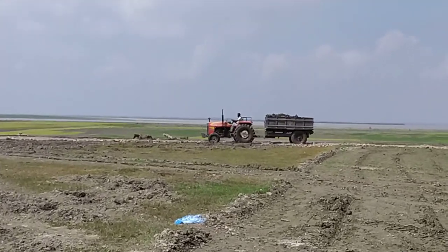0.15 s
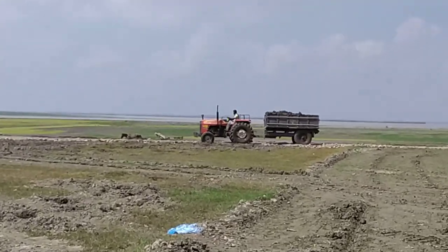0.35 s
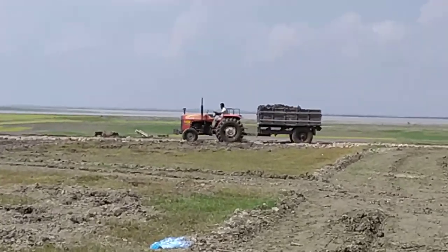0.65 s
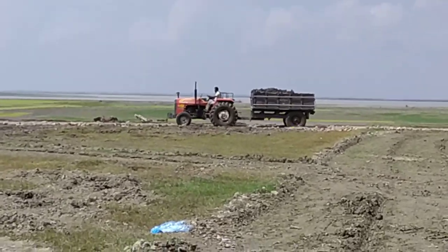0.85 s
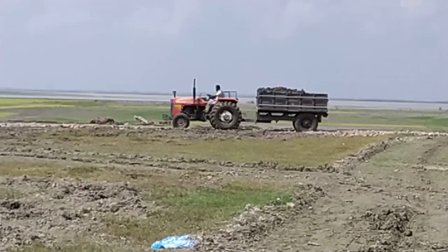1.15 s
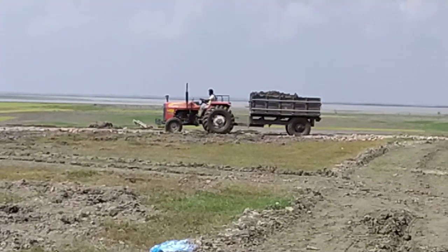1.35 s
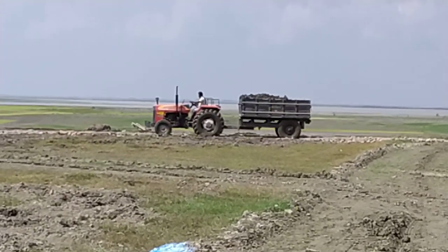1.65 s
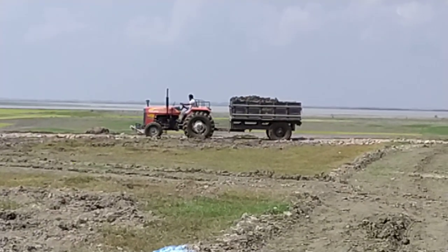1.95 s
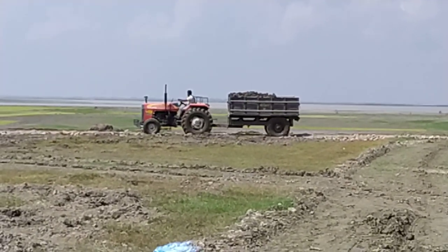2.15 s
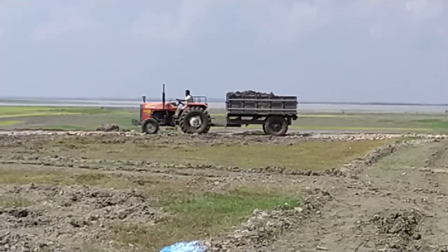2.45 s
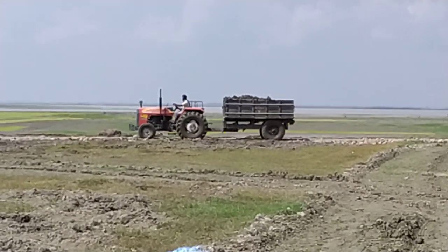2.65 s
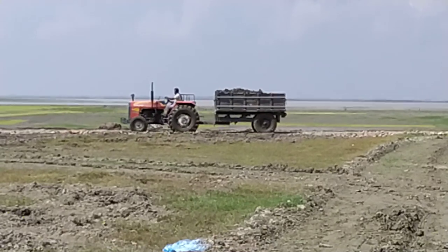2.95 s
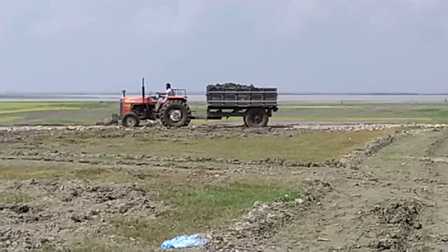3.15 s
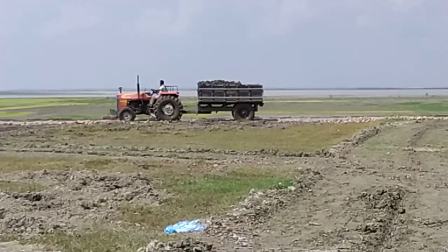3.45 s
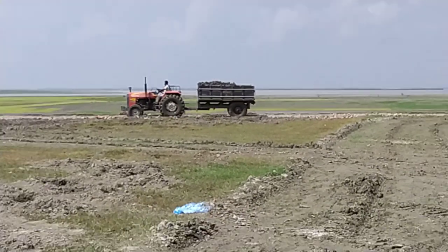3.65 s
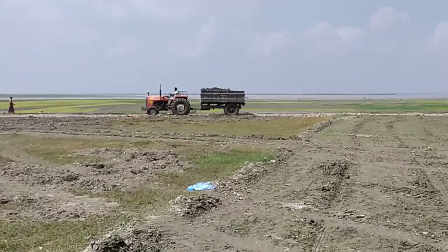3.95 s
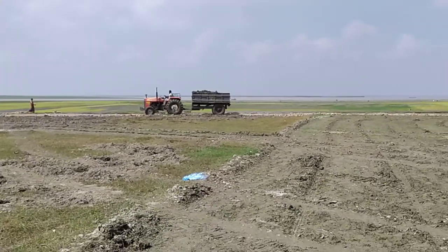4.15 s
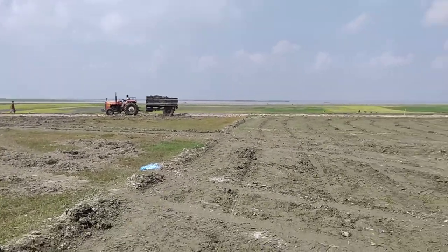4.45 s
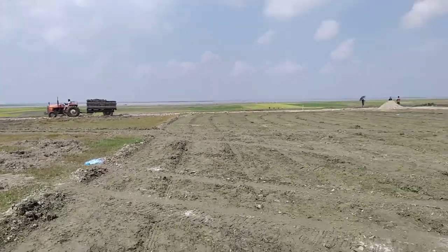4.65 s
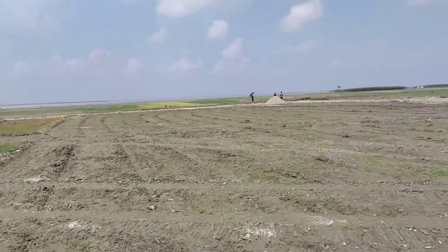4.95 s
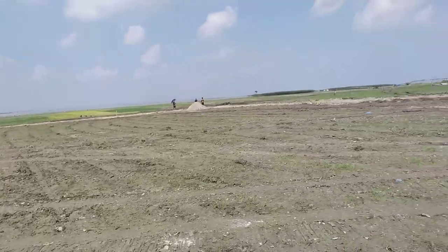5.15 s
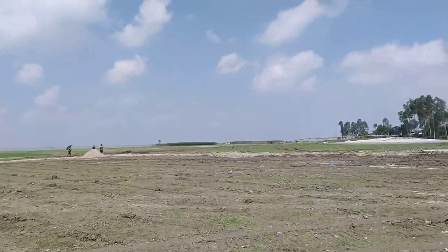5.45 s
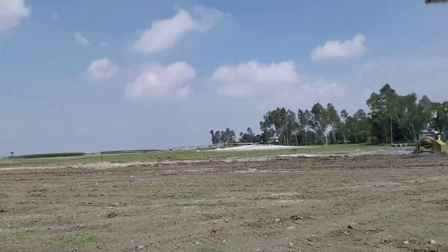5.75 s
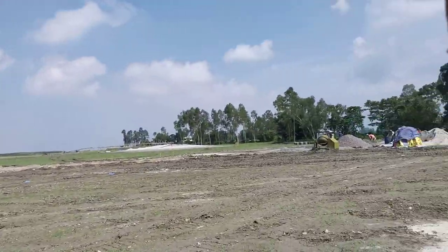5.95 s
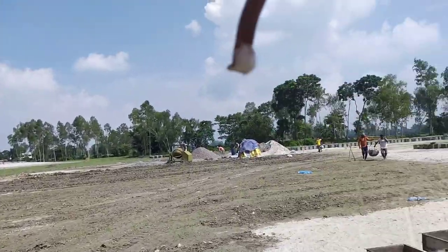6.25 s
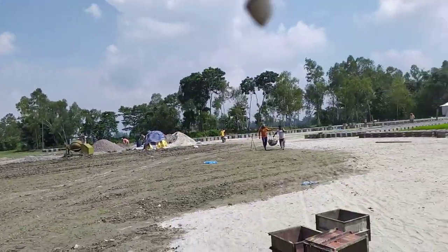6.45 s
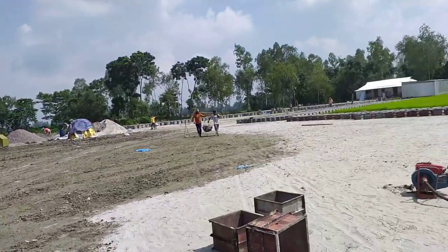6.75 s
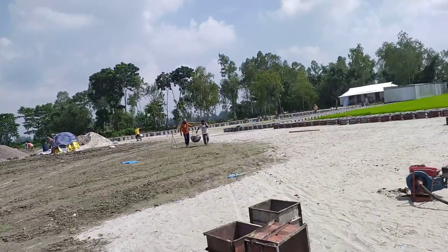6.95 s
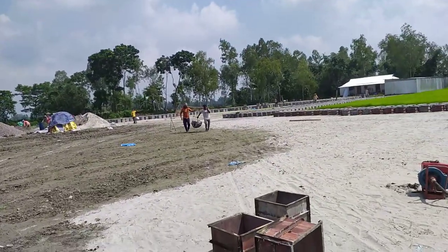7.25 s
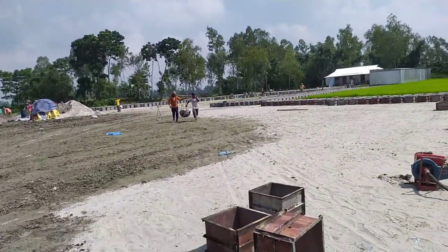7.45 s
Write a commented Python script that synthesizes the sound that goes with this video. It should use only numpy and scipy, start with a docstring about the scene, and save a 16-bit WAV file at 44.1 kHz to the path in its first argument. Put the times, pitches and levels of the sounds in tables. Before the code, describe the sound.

Steady shrill squealing of a spinning shaft around a low hum, fast engine puttering and rattling covers, soft wind, two brief hard knocks.

```python
"""Concrete poker vibrator driven by a small engine

A small four-stroke engine drives the poker through a flexible shaft in an open yard. The poker hums as harmonics
of its speed, and the rubbing shaft squeals loudly as short squeaks in every turn. Under them the exhaust putters
as engine harmonics, and filtered noise and rings make the clatter. Wind rumbles softly and two light clacks fall
midway. The camera, with a microphone port on each side, swings towards the machine and recolours the sounds."""
import sys
import numpy as np
from scipy import signal
from scipy.fft import rfft, irfft
from scipy.io import wavfile
from scipy.ndimage import uniform_filter1d, minimum_filter1d, map_coordinates

SR = 44100
rng = np.random.default_rng(int(sys.argv[2]) if len(sys.argv) > 2 else 0)


def generate_wav(signal):
    """Clip the signal to [-1, 1] and save it as 16-bit WAV at the path in sys.argv[1]."""
    frames = np.transpose(np.atleast_2d(signal))
    scaled = np.clip(frames, -1, 1) * 32767
    pcm = np.round(scaled).astype(np.int16)
    wavfile.write(sys.argv[1], SR, pcm)


N = 335160
TIME = np.arange(N) / SR
HZ = np.fft.rfftfreq(N, 1 / SR)

# mean speed of the poker, hunting under the load: t/s, speed/(turns per second)
SPEED = [(0, 182.8), (.12, 183.5), (.35, 182.7), (.55, 180.4), (1.1, 180.6), (1.33, 182.5), (1.72, 182.7),
         (2.05, 182.2), (2.25, 180.7), (2.72, 183), (2.95, 180.6), (3.1, 180.5), (3.7, 182.8), (3.9, 182.4),
         (4.2, 179.5), (4.5, 179.3), (4.8, 180.2), (5, 182.9), (5.4, 182.6), (5.58, 180.8), (5.78, 182.4),
         (6.15, 181.3), (6.48, 180.2), (6.7, 180.9), (7, 182.7), (7.25, 182.7), (7.38, 180.4),
         (7.55, 182.9)]
TURNS_PER_CYCLE = 8.4138  # poker turns in one engine cycle, which is two turns of the crank


def amp(db):
    """Decibels to gain."""
    return 10 ** (np.asarray(db) / 20)


def unit(x):
    """Scales to an rms of one."""
    return x / np.sqrt(np.mean(x ** 2) + 1e-20)


def curve(rows, column=1):
    """One column of a table, joined by straight lines in time."""
    rows = np.asarray(rows, float)
    return np.interp(TIME, rows[:, 0], rows[:, column])


def facing():
    """How far the camera faces the machine, from 0 (away) to 1 (towards it)."""
    # the camera's swing: t/s, share facing the machine/(0-1)
    camera_swing = [(0, 0.14), (4.3, 0.05), (5.2, 0.2), (5.75, 0.69), (6.5, 0.84), (7.1, 0.89), (7.6, 0.99)]
    return np.clip(curve(camera_swing), 0, 1)


def drift(rate_hz):
    """Smooth random wander of rms one, fading out above the rate."""
    return unit(irfft(rfft(rng.standard_normal(N)) * np.exp(-(HZ / rate_hz) ** 2), N))


def delayed(x, seconds):
    """The sound heard after a delay that may change with time."""
    return map_coordinates(x, [(TIME - seconds) * SR], order=1, mode="mirror")


def ports(x, lead_s=0.0001946):
    """Sound from the left reaches the left microphone port first."""
    return np.array([x, delayed(x, lead_s)])


def colour(x, spectrum):
    """Filters by a table of f/Hz and level/dB, to an rms of one."""
    hz, db = np.transpose(spectrum)
    gain = amp(np.interp(np.log(HZ + 1), np.log(hz), db))
    return unit(irfft(rfft(x) * gain, N))


def swing(x, away, toward):
    """Blends two colours, at equal power, as the camera swings round."""
    return np.sqrt(1 - facing()) * colour(x, away) + np.sqrt(facing()) * colour(x, toward)


def whiten(x, size=11, count=70):
    """Evens out each port's broad spectrum, over size bins and count frames, and keeps its fine lines."""
    z = signal.stft(x, nperseg=2048, noverlap=1536)[2]
    power = uniform_filter1d(abs(z) ** 2, size=size, axis=1)
    power = uniform_filter1d(power, size=count, axis=2)
    flat = z / np.sqrt(abs(power) + 1e-7 * power.max())
    return signal.istft(flat, nperseg=2048, noverlap=1536)[1][:, :N]


def scattered(x, echo_db, spread_s, slide_s=0.00209, count=7):
    """Short echoes off the moulds and the machine; their paths slide as the camera moves."""
    out = ports(x)
    moved = facing() ** 0.756 + 0.018 * drift(0.83)
    for channel in out:
        for place, slide, sign in rng.random((count, 3)):
            lag = 0.000512 + spread_s * place ** 2 + slide_s * (slide - .3) * moved
            channel += amp(echo_db) * np.sign(sign - .5) * delayed(x, lag) / np.sqrt(count)
    return out


def diffused(x, wash_db):
    """Adds steady noise, separate at each port, for the many faint echoes that blur into a wash."""
    return unit(x) + amp(wash_db) * rng.standard_normal((2, N))


def levelled(x, size=4000):
    """Holds each channel at a running rms of one, over a window of size samples."""
    return x / np.sqrt(uniform_filter1d(x ** 2, size=size, axis=1))


def resonate(x, hz, width_hz):
    """A resonance of gain one that follows a moving pitch: shift to zero, smooth, shift back."""
    turn = np.exp(2j * np.pi * np.cumsum(hz) / SR)
    r = np.exp(-np.pi * width_hz / SR)
    return 2 * (turn * signal.lfilter([1 - r], [1, -r], x / turn)).real


def ring_filter(x, hz, width_hz):
    """Two resonant poles in a row, as of a struck part that rings at one pitch."""
    return irfft(rfft(x) / (1 + 1j * (HZ - hz) / width_hz) ** 2, N)


def gliding(x):
    """Narrow bands swell, slide and sink back as echo paths change with the camera's moves."""
    # sliding bands: start t/s, end t/s, from f/Hz, to f/Hz, width/Hz, peak added gain left, the same right
    glides = [(.85, 1.75, 5880, 6100, 160, .7, .3), (1.3, 3.2, 5480, 5500, 130, .7, .1),
              (2.6, 4.7, 5640, 5540, 130, 1, 0), (6.5, 7.7, 6000, 6060, 130, 0, .9),
              (4.25, 4.8, 5600, 5150, 120, 1, .3), (4.45, 5.02, 5650, 6150, 130, 1.2, .6),
              (4.85, 5.25, 5520, 5150, 120, 1.6, .6), (4.87, 5.55, 6350, 5720, 130, .3, 1.4),
              (5, 5.65, 5480, 5080, 130, 1, 2), (5.1, 5.65, 6450, 5520, 130, 1.1, .5),
              (5.33, 5.68, 6500, 6050, 130, 2, .5), (5.55, 6.02, 6260, 6180, 130, .8, 1.6),
              (5.9, 6.4, 6250, 5680, 150, .4, 1.6), (5.85, 6.65, 6420, 5660, 130, 2, .3),
              (4.1, 4.9, 1520, 1280, 120, .7, .7), (5.4, 6.7, 1300, 1030, 130, .8, .8),
              (5.95, 6.7, 2350, 1980, 260, 1.2, 1.2)]
    out = x.copy()
    for start, end, from_hz, to_hz, width_hz, left, right in glides:
        span = (TIME >= start) & (TIME < end)
        way = (TIME[span] - start) / (end - start)
        hz = from_hz + (to_hz - from_hz) * way
        swell = np.outer([left, right], np.sin(np.pi * way))
        out[:, span] += swell * resonate(x[:, span], hz, width_hz)
    return out


def shaft_wobble(sway_hz=9.5, sway_turns=.011, whip_hz=10.2, jitter_hz=9, jitter_turns=.009):
    """Turns by which the flexible shaft leads or lags: a slight sway, irregular jitter and short fits of whipping."""
    # fits of whipping that make the squeal warble: middle t/s, half length/s, depth/turns
    whips = [(1.32, .22, .036), (2.28, .1, .028), (2.76, .15, .034), (3.55, .08, .03), (4.62, .15, .022),
             (5.3, .25, .032), (6.12, .2, .03), (7.13, .15, .014)]
    sway_phase = 2 * np.pi * (sway_hz * TIME + .2 * drift(1.5))
    wobble = sway_turns * (1 + .35 * drift(1.5)) * np.sin(sway_phase)
    wobble += jitter_turns * drift(jitter_hz)
    for middle, half, depth in whips:
        fit = np.exp(-((TIME - middle) / half) ** 2)
        wobble += depth * fit * np.sin(2 * np.pi * whip_hz * (TIME - middle))
    return wobble


def poker_hum(turns, steepness=5, waver_db=1.25):
    """The off-centre weight shakes the tube once a turn, giving a hum and wavering harmonics."""
    # hum harmonics: multiple of the poker's speed, mean level facing away/dB, the same facing the machine/dB
    harmonics = [(1, -22.5, -24), (2, -41.5, -25.5), (3, -44.5, -37), (4, -48.5, -35.5), (5, -67, -38),
                 (6, -66, -50)]
    out = np.zeros(N)
    for k, away_db, facing_db in harmonics:
        level_db = away_db + (facing_db - away_db) * facing() ** steepness
        level_db += waver_db * np.sqrt(k) * drift(3.6)
        out += np.sqrt(2) * amp(level_db) * np.cos(2 * np.pi * (round(k) * turns + rng.random()))
    return ports(out, lead_s=0.000097)


def squeal_level_db(edge_s=.1):
    """Level of the squeal at each port: steady, but for spells that ease in and out."""
    # steady squeal: left level/dB, right level/dB
    steady_db = (-10.5, -9)
    # swells and fades: start t/s, end t/s, change at the left port/dB, change at the right port/dB
    spell_rows = [(0, .9, -9.5, .7), (.32, .56, 3, .7), (.9, 1.44, 5, 1.5), (1.44, 1.85, 1.5, .3),
                  (2.18, 2.38, -1.5, -2.7), (2.45, 2.88, .6, .8), (2.92, 3.38, -4, -.7),
                  (3.1, 3.3, -3.5, -.5), (3.5, 3.98, .5, 1), (4.33, 4.57, 0, -3), (4.59, 4.72, 1.5, 2.5),
                  (4.76, 4.89, -.5, -3), (4.92, 5.07, 2, 1.5), (5.12, 5.38, -.5, 1.3), (5.38, 5.56, 3, .5),
                  (5.56, 5.96, -7, 0), (5.66, 6.28, 0, 3.3), (5.96, 6.46, -4.5, 0), (6.42, 6.52, 0, -3),
                  (6.46, 6.88, -6, -1), (6.88, 7.7, -10, -2.5), (7.45, 7.7, 1.5, 1.5)]
    db = np.outer(steady_db, np.ones(N))
    for start, end, left_db, right_db in spell_rows:
        db += np.outer([left_db, right_db], (TIME >= start) & (TIME < end))
    return uniform_filter1d(db, size=round(edge_s * SR), axis=1)


def squeal(turns, crank, pitch_hz=5720, rise_hz=170, sag_hz=140, throb_db=2.5, octave_db=-14,
           octave_throb_db=2.5, scatter_db=1.1, hiss_db=-27, wash_db=-16, flutter_db=.85, flutter_hz=14):
    """Each rub squeaks the tube nearly alike in every turn, so the squeal is a comb of lines that waver with speed."""
    # rubs in each turn: place/(turn 0-1), length/turns, level/dB, loudest place/(crank turn 0-1)
    rubs = [(.1, .12, 0, .8), (.37, .11, -1, .78), (.78, .12, -.5, .55)]
    # ring of the steel tube and its hose, facing away and facing the machine: f/Hz, relative level/dB
    ring_away = [(3800, -24), (4330, -12.5), (4600, -18), (5020, -1.5), (5200, 0), (5470, 3.5), (5640, 4.5),
                 (5800, -2), (6000, -4.5), (6230, -4.5), (6450, -9.5), (6650, -4.5), (6790, -3.5),
                 (7050, -22.5), (7550, -11), (7800, -24.5), (8280, -8), (9000, -30), (9900, -23),
                 (10600, -13), (11200, -13.5), (11620, -3), (12050, -39), (12700, -35), (16000, -40)]
    ring_facing = [(3800, -21), (4700, -17.5), (5200, -36), (5450, -11.5), (5800, 1), (6020, 4.5),
                   (6220, 4), (6500, -20), (6700, -11), (6820, -13), (7200, -19), (7950, -26), (8300, -18),
                   (9000, -32), (10800, -17.5), (11250, -20.5), (11600, -9), (12000, -12), (12700, -43),
                   (16000, -31)]

    # the crank's uneven pull bends timing and pitch; the pitch drops fast and climbs slowly
    lurch = 1 - .3 * facing()  # radians
    pull = 2 * np.pi * (crank - .48)
    sag = sag_hz * (np.sin(pull) + 0.19 * np.sin(2 * pull))
    pitch = pitch_hz + rise_hz * facing() - sag
    octave = amp(octave_db + octave_throb_db * np.cos(pull))
    speed = curve(SPEED)
    squeaks, contact = np.zeros(N), np.zeros(N)
    for place, length, db, loudest in rubs:
        offset = (turns - place + .5) % 1 - .5  # turns from the middle of the rub
        throb = 2 * np.pi * (crank - loudest)
        force = amp(db + scatter_db * drift(48) + throb_db * np.cos(throb))
        force *= np.exp(-.5 * (offset / length) ** 2)
        phase = 2 * np.pi * pitch * offset / speed + lurch * np.sin(throb)
        phase += .08 * drift(100) + .33 * drift(4) + 2 * np.pi * rng.random()  # no two squeaks quite alike
        squeaks += force * (np.cos(phase) + octave * np.cos(2 * phase))
        contact += force
    hiss_throb = amp(octave_throb_db * np.cos(pull) / 2)
    squeaks += amp(hiss_db) * contact * hiss_throb * rng.standard_normal(N)

    echoes = scattered(squeaks, echo_db=-.5, spread_s=.005)
    blurred = diffused(whiten(echoes), wash_db=wash_db)
    heard = gliding(swing(blurred, ring_away, ring_facing))
    return levelled(heard) * amp(squeal_level_db() + flutter_db * drift(flutter_hz))


def exhaust(cycles, facing_db=2.5, size=256):
    """One puff every second turn of the crank, ringing in the silencer."""
    # spectrum of a puff, facing away: multiple of the engine's cycle rate, level/dB
    puff = [(2, -52), (3, -39.5), (4, -40), (5, -39.5), (6, -36.5), (7, -49.5), (8, -38.5), (9, -36.5),
            (10, -41), (11, -43), (12, -33.5), (13, -46), (14, -43.5), (15, -39.5), (16, -43.5),
            (17, -42.5), (18, -48.5), (19, -41), (20, -59.5), (21, -50), (22, -47.5), (23, -49.5),
            (24, -50)]
    order, db = np.transpose(puff)
    gain = amp(np.interp(np.arange(size // 2 + 1), np.round(order), db, left=-60, right=-62))
    # minimum phase: each puff starts sharply, then decays
    phase = -signal.hilbert(np.log(np.r_[gain, gain[-2:0:-1]])).imag
    out = np.zeros(N)
    for k in np.round(order).astype(int):
        out += gain[k] * np.cos(2 * np.pi * k * (cycles - .15) + phase[k])
    uneven = 1 + .1 * drift(25)  # each firing differs a little
    return ports(np.sqrt(2) * out * uneven) * amp(facing_db * facing() ** 2)


def exhaust_rasp(cycles, level_db=-44, lowest=20, count=27):
    """The puffs' upper harmonics ring in the silencer and grow as the camera turns to the machine."""
    # the silencer's upper resonances: f/Hz, relative level/dB
    resonances = [(430, -4.5), (455, -13), (520, 1), (555, 0.5), (600, -7.5), (650, 1.5), (690, -4.5),
                  (712, 2), (750, -32), (778, -1), (812, -27), (865, -4.5), (930, -2.5), (1000, 8)]
    orders = lowest + np.arange(count)
    cycle_hz = curve(SPEED).mean() / TURNS_PER_CYCLE
    gains = amp(np.interp(orders * cycle_hz, *np.transpose(resonances)))
    out = np.zeros(N)
    for k, gain in zip(orders, gains):
        waver = 1 + 0.39 * drift(6.5)
        out += gain * waver * np.cos(2 * np.pi * (k * cycles + rng.random()))
    return ports(out) * amp(level_db) * (0.21 + 0.74 * facing() ** 3)


def grounded(x, strength, delay_s=0.000794, later_s=0.00062, steepness=14):
    """The echo off the ground combs the sound; it gets later as the camera ends its swing and lifts."""
    lag = delay_s + later_s * facing() ** steepness
    echo = np.array([delayed(channel, lag) for channel in x])
    return (x + strength * echo) / np.sqrt(1 + strength ** 2)


def two_bands(x, middle_db=2.5, treble_db=6.0, split_hz=2350):
    """The middle and the treble of the clatter each follow their own level."""
    # clatter levels, before each band's trim: t/s, middle level/dB, treble level/dB
    band_levels = [(0.2, -35.5, -37), (0.57, -32, -34.5), (1.91, -30.5, -26), (3.27, -32.5, -30),
                   (3.7, -35, -24.5), (5.38, -29.5, -30), (7.44, -25.5, -30), (7.5, -26.5, -29)]
    middle = irfft(rfft(x) / (1 + (HZ / split_hz) ** 12), N)
    treble = x - middle
    middle_gain = amp(curve(band_levels, column=1) + middle_db)
    treble_gain = amp(curve(band_levels, column=2) + treble_db)
    return levelled(middle, size=12000) * middle_gain + levelled(treble, size=12000) * treble_gain


def cover_rings(cycles, force, ring_noise=0.4):
    """The thin covers ring with the engine: a steady harmonic mixed with noise through a resonance."""
    # covers: f/Hz, width/Hz, level facing away/dB, level midway/dB, level facing the machine/dB,
    # lag of the right port facing away/(periods of the ring)
    covers = [(1063, 28, -50, -34.5, -48, 0.61), (1165.4, 51, -30.5, -30, -41.5, 0.48),
              (1345.6, 34, -39.5, -40, -45, 0.13), (1531, 18, -35, -60, -40, 0.26),
              (1528.7, 27, -36, -43, -34, 0.26), (2040, 70, -49, -42, -52, 0.35)]
    out = np.zeros((2, N))
    for hz, width, away_db, midway_db, facing_db, apart in covers:
        order = round(hz * TURNS_PER_CYCLE / curve(SPEED).mean())  # the engine harmonic nearest to the ring
        sung = np.sqrt(2) * np.cos(2 * np.pi * (order * cycles + rng.random()))
        fuzz = unit(ring_filter(force * rng.standard_normal(N), hz, width))
        ring = unit((1 - ring_noise) * sung + ring_noise * fuzz)
        lead_s = np.interp(facing(), [.1, .7], [apart / hz, .00015])
        level_db = np.interp(facing(), [.1, .7, 1], [away_db, midway_db, facing_db])
        out += ports(ring, lead_s) * amp(level_db)
    return out


def clatter(cycles, turns, repeat=0.77, knock=0.17, shake=0.43, size=2040):
    """Valves and piston rattle, partly alike in every cycle; the thin covers ring along."""
    # colour of the rattle, facing away and facing the machine: f/Hz, relative level/dB
    rattle_away = [(30, -35), (150, -13), (400, -13.5), (600, -2.5), (820, -20.5), (1200, -12), (1370, 1.5),
                   (1520, -2), (1680, -17), (2200, -6), (2550, 7), (3300, 0.5), (3780, 8.5), (3980, -11),
                   (4300, 13), (4600, -7), (5500, 11.5), (9000, -59)]
    rattle_facing = [(30, -35), (150, -21), (400, -30), (550, -8), (800, -0.5), (1050, 0), (1400, 3),
                     (1700, -0.5), (2050, 8), (2600, 5), (3100, -8), (3450, -4), (3800, 13.5), (4050, 8),
                     (4300, -9), (5500, 13), (9000, -47)]
    pattern = np.tile(rng.standard_normal(size), 2)
    alike = unit(np.interp(cycles % 1 * size, np.arange(2 * size), pattern))
    # a decaying knock every crank turn, and a shake every poker turn
    force = 1 + knock * np.exp(-((2 * cycles - .4) % 1) / 0.044)
    force += shake * np.cos(2 * np.pi * (turns - .73))
    rattle = force * (repeat * alike + rng.standard_normal(N))
    echoes = scattered(rattle, echo_db=6.5, spread_s=.003)
    blurred = diffused(whiten(echoes, size=5), wash_db=-8)
    heard = swing(blurred, rattle_away, rattle_facing)
    heard = two_bands(gliding(grounded(heard, strength=0.11)))
    return heard + cover_rings(cycles, force)


def wind(level_db=-32.5, facing_db=2.0, waver_db=2.0, gust_s=.06):
    """Low noise of the open yard, partly shared by the ports; it wavers and swells in short buffets."""
    # wind colour: f/Hz, relative level/dB
    rumble = [(10, -42), (30, -31), (36, -31), (43, 16), (70, 13), (130, 20), (220, 5), (400, 7.5),
              (900, -56)]
    # buffets on the microphone: t/s, rise above the rumble/dB
    gusts = [(.8, 3), (3.21, 11), (3.35, 8), (5.26, 7), (5.73, 6), (5.98, 4), (6.57, 3)]
    air = rng.standard_normal(N) + rng.standard_normal((2, N))
    buffets = sum(db * np.exp(-((TIME - s) / gust_s) ** 2) for s, db in gusts)
    return colour(air, rumble) * amp(level_db + facing_db * facing() + waver_db * drift(1.0) + buffets)


def clacks(width_hz=450, decay_s=0.07, high_db=1.5):
    """Short knocks of something hard nearby: a noise burst, 60 dB down after decay_s, through two rings."""
    # knocks: t/s, peak level of the low ring/dB, low ring f/Hz, high ring f/Hz
    knocks = [(4.335, -14, 1200, 2700), (4.683, -14, 1500, 3600)]
    out = np.zeros(N)
    for s, db, low_hz, high_hz in knocks:
        burst = rng.standard_normal(N) * (TIME >= s) * amp(-60 * abs(TIME - s) / decay_s)
        for hz, ring_db in (low_hz, db), (high_hz, db + high_db):
            knock = ring_filter(burst, hz, width_hz)
            out += amp(ring_db) * knock / abs(knock).max()
    return ports(out, lead_s=.00005)


def scene(hunt_turns=0.014):
    """One speed drives poker, squeal and engine; the flexible shaft winds and unwinds, so the poker wobbles."""
    turns = np.cumsum(curve(SPEED)) / SR + hunt_turns * drift(3.5)
    cycles = turns / TURNS_PER_CYCLE
    poker_turns = turns + shaft_wobble()
    poker = poker_hum(poker_turns) + squeal(poker_turns, crank=2 * cycles)
    engine = exhaust(cycles) + exhaust_rasp(cycles) + clatter(cycles, turns)
    return poker + engine + wind() + clacks()


def record(dry, ceiling=0.82, cutoff_hz=16100):
    """The ports' colours, a fast limiter that holds the peaks down, then the band limit."""
    # how the two ports differ: f/Hz, left minus right facing away/dB, the same facing the machine/dB
    port_colour = [(100, -1, 0), (550, 0, 0.5), (1200, 0, 0.5), (1480, 3.5, 3.5), (2120, 6, 2),
                   (2630, 5, -1.5), (3070, 14.5, 10), (3680, 1.5, -3), (4600, -0.5, 15), (4600, 5, -9),
                   (5000, 18, 8), (5300, 1, 11), (5920, 10.5, -5), (5400, -4.5, 6), (6260, -2.5, 3),
                   (6300, -7, 7.5), (6540, 22.5, 26), (6700, -5.5, -4), (8300, -1, -4), (10000, -2.5, -3),
                   (11600, 0.5, -1)]
    hz, away_db, facing_db = np.transpose(port_colour)

    def coloured(db):
        """Tilts the ports apart, half of the difference on each."""
        return irfft(rfft(dry) * amp(np.outer([.5, -.5], np.interp(HZ, hz, db))), N)

    away, toward = coloured(away_db), coloured(facing_db)
    heard = away + (toward - away) * np.interp(facing(), [.1, .8], [0, 1])
    headroom = np.minimum(1, ceiling / (abs(heard) + 1e-9))
    gain = uniform_filter1d(minimum_filter1d(headroom, size=60, axis=1), size=60, axis=1)
    lowpass = signal.firwin(511, cutoff_hz, window=("kaiser", 9), fs=SR)
    return signal.oaconvolve(heard * gain, lowpass[None], "same")


dry = scene()
out = record(dry)
generate_wav(out)
```